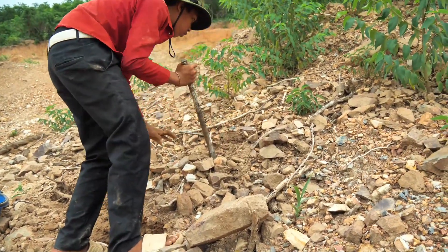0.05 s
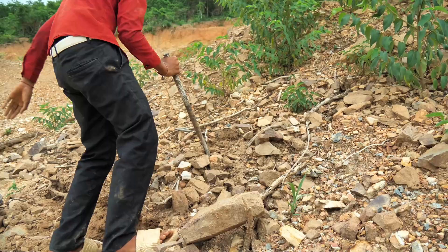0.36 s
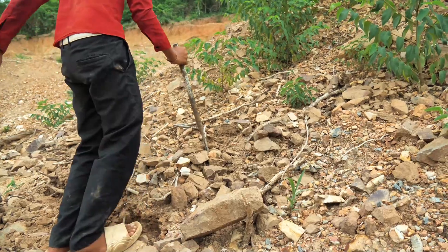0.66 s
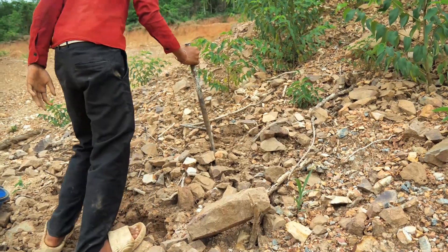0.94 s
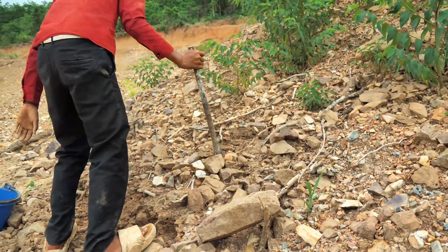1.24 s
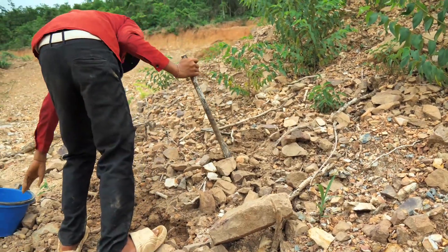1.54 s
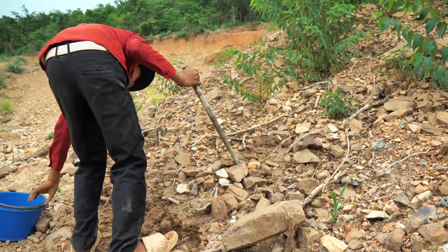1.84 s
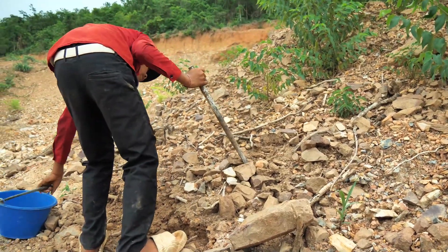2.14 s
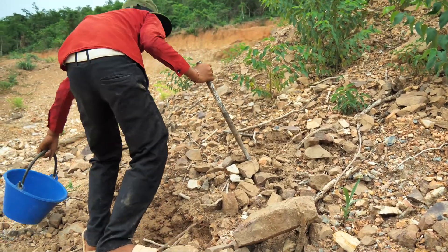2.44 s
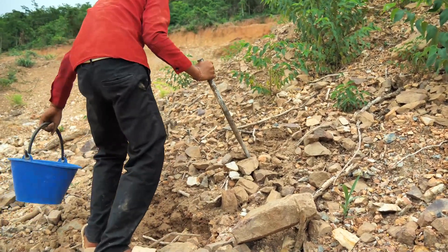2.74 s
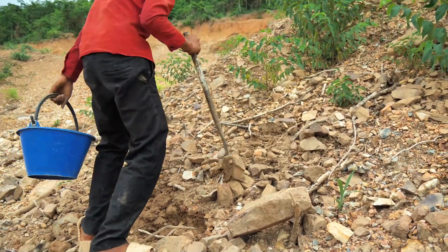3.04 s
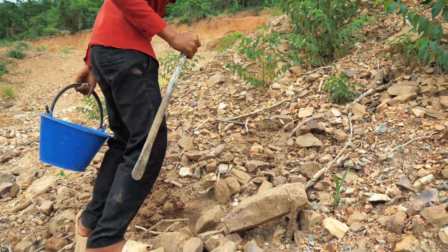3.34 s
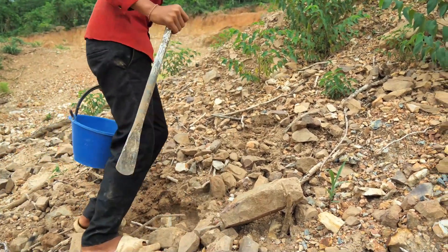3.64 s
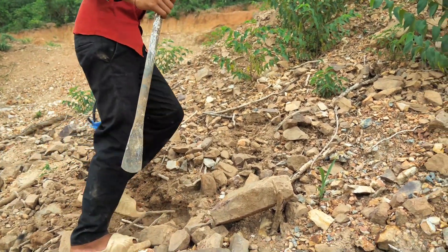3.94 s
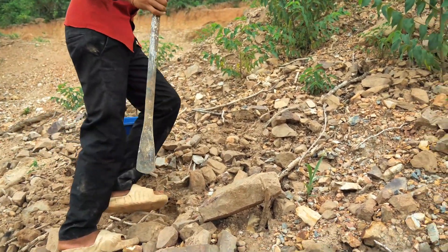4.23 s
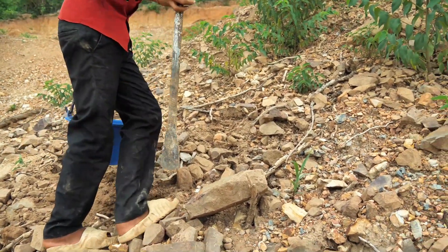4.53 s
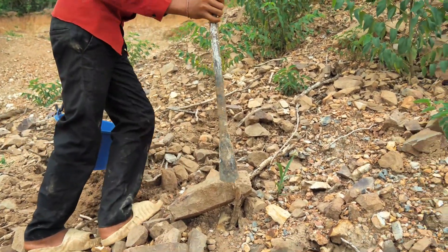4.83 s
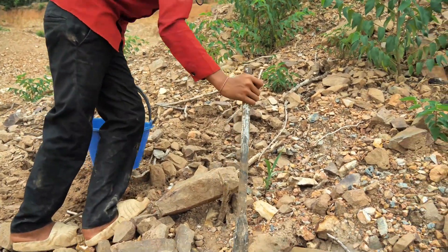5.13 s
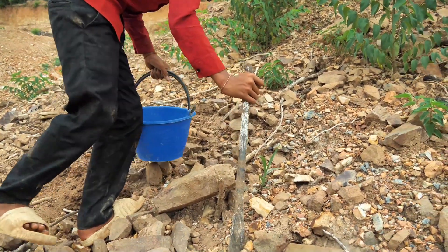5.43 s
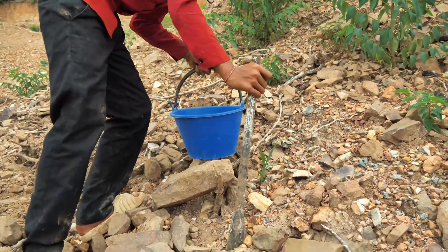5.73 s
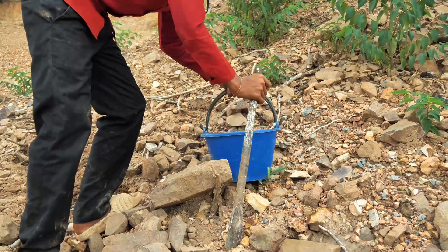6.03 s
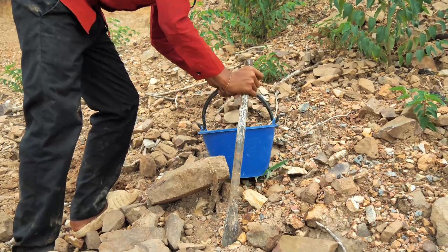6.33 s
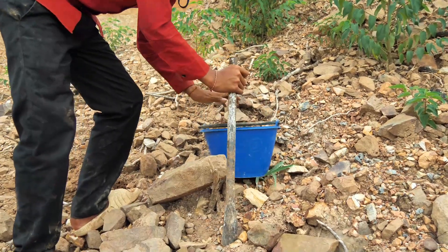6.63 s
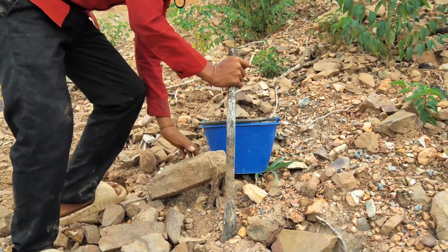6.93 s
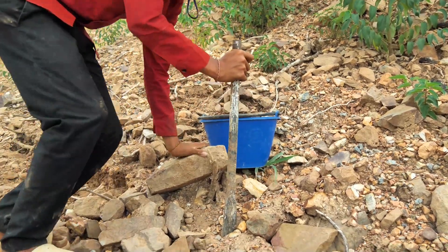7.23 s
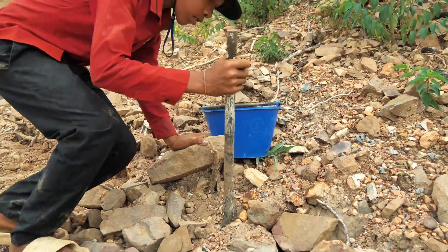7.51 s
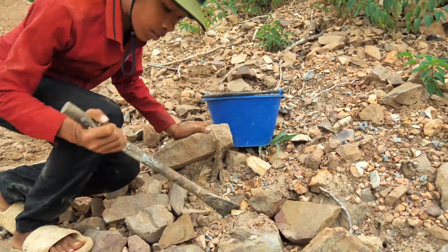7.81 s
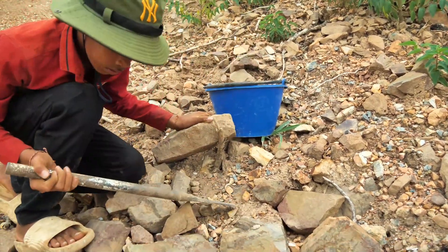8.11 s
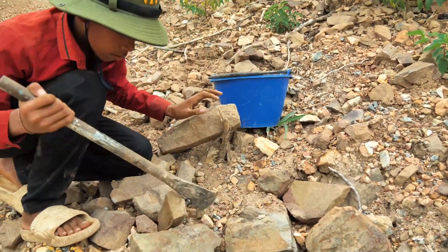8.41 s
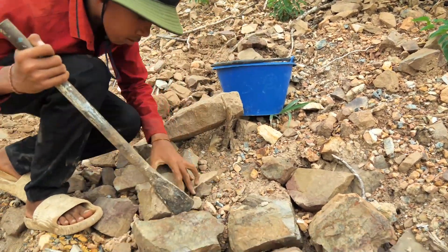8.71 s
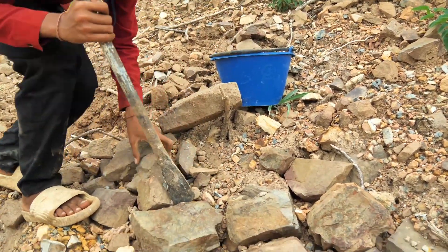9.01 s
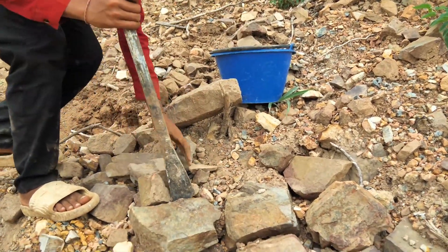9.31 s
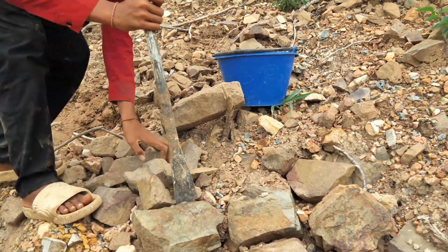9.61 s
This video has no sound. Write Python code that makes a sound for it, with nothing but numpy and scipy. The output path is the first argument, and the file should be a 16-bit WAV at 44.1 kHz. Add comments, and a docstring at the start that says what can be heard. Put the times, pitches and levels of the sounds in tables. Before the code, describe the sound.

Loose stones knock underfoot, a plastic bucket is set down, and a steel digging bar scrapes and clanks loudly on rock outdoors.

```python
"""Open hillside of loose stones: someone shuffles about, sets down a plastic bucket, drops its handle
and pries with a steel digging bar. The bar zings faintly in the hand, scrapes gravel, clanks on rock
and rings in bending modes until damped. The bucket's hollow wall booms; its wire hooks jingle. Stones
knock and thud underfoot. Gravel, soles and cloth scuff over quiet outdoor hiss. No walls, no echo."""
import sys
import numpy as np
from scipy import signal
from scipy.fft import rfft, irfft
from scipy.io import wavfile
from scipy.ndimage import uniform_filter1d

SR = 44100
rng = np.random.default_rng(int(sys.argv[2]) if len(sys.argv) > 2 else 0)


def int16_out(signal):
    """Quantize to a 16-bit WAV file."""
    q = np.round(np.clip(np.atleast_2d(signal).T, -1, 1) * 32767)
    wavfile.write(sys.argv[1], SR, q.astype(np.int16))


N = 430416

# bar contacts: t/s, level/dB, tilt/(dB/oct), lead mode f/Hz, its boost/dB, free ring/s
BAR_HITS = [(1.114, -19.5, 1, 2162, 36.5, 0.16), (1.115, -24.5, -3.5, 5470, 30.5, 0.02),
            (1.155, -29, 3, 5470, 19, 0.0069), (8.155, -21, -0.5, 1470, 19.5, 0.066),
            (8.357, -15, -1, 5470, 10.5, 0.007), (8.488, -12.5, -2, 3338, 11, 0.036),
            (8.643, 2.5, 0.5, 791, 4, 0.079), (8.709, 1, -0.5, 5470, 13, 0.046),
            (8.744, -3, -2, 4624, 12, 0.027), (8.779, -7.5, -2, 812, 13.5, 0.01),
            (8.795, -6.5, -1.5, 812, 13, 0.0059)]
# bar bending modes: f/Hz, level/dB, t60/s
STEEL_MODES = [(803, -26, .9), (1102, -33, .7), (1470, -35, .5), (2003, -36, .25), (2162, -33, .19),
               (2366, -36, .5), (3338, -35, .5), (3570, -35, .4), (4624, -37, .5), (5203, -36, .25),
               (5470, -35, .2), (5972, -35, .25), (7095, -41, .15), (7388, -35, .3), (8696, -32, .18),
               (9825, -40, .22), (11405, -39, .22), (12890, -44, .12), (14300, -46, .22)]
# blade bouncing on a slab: t/s, level/dB, cut-off f/Hz, chatter t60/s
SLAB_HITS = [(8.6433, -13, 6440, 0.0068), (8.683, -22, 3200, 0.016), (8.7086, -19, 5000, 0.02),
             (8.743, -26.5, 2500, 0.023), (8.779, -24.5, 2190, 0.034), (8.796, -31, 2290, 0.022)]
# slab modes: f/Hz, level/dB, t60/s
ROCK_MODES = [(404, 18, 0.039), (1170, 10, 0.0073), (1570, 4, 0.011), (2880, 22, 0.012),
              (3090, 20.5, 0.013), (3900, 23.5, 0.011), (5500, 4, 0.0099),]
# bar rubbed, shaft in hand (faint) or blade on gravel: start t/s, end t/s, level/dB, brightest f/Hz
BAR_RUBS = [(1.315, 1.38, -57, 7100), (2.963, 3.073, -55, 6730), (8.02, 8.197, -48, 5000),
            (8.42, 8.524, -42.5, 3440), (8.8, 9.065, -55.5, 4500)]
# bucket rocking to rest, then handle bouncing: t/s, level/dB, hardness/(dB/band), nominal t60/s
BUCKET_HITS = [(6.034, -17.5, 1.5, 0.26), (6.051, -17, 2, 0.14), (6.076, -15.5, -2.5, 0.051),
               (6.084, -15.5, -2.5, 0.018), (6.117, -18.5, -1, 0.38), (6.153, -18, -1, 0.052),
               (6.218, -28, 0.5, 0.033), (6.315, -30, -2.5, 0.022), (6.663, -18.5, 3.5, 0.15),
               (6.726, -15.5, 5, 0.032), (6.787, -23.5, 3, 0.07), (6.816, -32, 3, 0.074)]
# bucket wall modes: f/Hz, level/dB, t60/s
WALL_MODES = [(226, 19, 0.092), (295, 26.5, 0.028), (376, 25, 0.033), (790, 19.5, 0.015),
              (1380, 14.5, 0.018), (1520, 6, 0.029), (2096, 13, 0.044), (2857, 15.5, 0.01)]
# hooks catching in their lugs: t/s, level/dB
HOOK_CATCHES = [(5.18, -30.5), (5.252, -41.5), (5.433, -43.5), (5.615, -40.5), (5.701, -43), (5.893, -41),
                (5.955, -36.5), (5.98, -37.5)]
# hooks rubbing: start t/s, end t/s, level/dB
HOOK_RUB = (5.2, 6.0, -50)
# hook modes: f/Hz, level/dB
WIRE_MODES = [(2826, -3.5), (3192, -10), (3989, -7.5), (5959, -5), (6298, -13), (7650, -3.5),
              (10180, -13.5), (11908, -19)]
# knocked stones: t/s, level/dB, f/Hz, softness/(dB/oct), nominal t60/s
STONE_KNOCKS = [(0.574, -43, 3270, 2, .006), (0.743, -43, 3230, -2.5, 0.0057),
                (1.094, -36.5, 1050, 1.5, 0.04), (1.112, -25.5, 1000, 4.5, 0.021),
                (1.157, -29, 1473, 9, 0.018), (1.946, -40.5, 1870, 10, 0.0067),
                (2.299, -42, 2220, 5, 0.024), (3.097, -30.5, 3500, 5, 0.007), (3.216, -18, 2800, 31, 0.017),
                (3.313, -28.5, 3400, 18, 0.015), (3.327, -24, 5000, 1, 0.022),
                (3.502, -21, 1510, 30, 0.012), (3.572, -33, 2440, 5, 0.016), (3.757, -29, 1670, 7, 0.023),
                (5.157, -18.5, 1246, 3.5, 0.025), (5.161, -19, 2950, -1, 0.019),
                (5.169, -20.5, 2690, 22, 0.022), (5.303, -25.5, 860, 5, 0.04),
                (5.506, -35.5, 2000, 9, 0.013), (5.631, -43, 7640, -2, 0.0066), (5.72, -35, 3000, 4, 0.1),
                (7.385, -36, 1530, 4.5, 0.021), (7.852, -35, 9700, 0, 0.017), (8.125, -35, 970, 3, 0.0083),
                (8.154, -27, 845, 8, 0.024), (8.401, -30.5, 701, 9, 0.019), (8.618, -34.5, 8300, 0, 0.0095),
                (8.854, -43, 5370, -10, 0.0043), (9.132, -36, 845, 12, 0.034),
                (9.289, -25.5, 890, 8, 0.015), (9.321, -20.5, 1540, 28, 0.019),
                (9.327, -18, 830, 9.5, 0.022), (9.333, -21.5, 1330, 21, 0.035),
                (9.362, -31, 2640, 6, 0.033), (9.615, -28.5, 856, 14, 0.017), (9.652, -28, 744, 9, 0.014)]
# stones trodden or dropped into soil: t/s, level/dB, f/Hz, relative grit level/dB, nominal t60/s
STONE_THUDS = [(0.322, -22, 384, -21, 0.015), (0.426, -36, 375, 2, 0.027), (0.684, -39, 277, -13, 0.024),
               (.718, -37, 270, -16, 0.016), (0.786, -32, 238, -24, 0.024), (0.801, -27, 303, -28, 0.05),
               (0.824, -34.5, 240, -17, 0.025), (0.916, -33.5, 186, -31, 0.24),
               (.973, -32, 232, -18, 0.069), (1.807, -32, 381, -32, 0.034), (2.036, -33, 397, -46, 0.13),
               (3.043, -35.5, 385, -3, 0.026), (3.138, -25, 410, -27, 0.022), (3.328, -28.5, 247, -7, 0.22),
               (3.433, -29.5, 390, -4.5, 0.014), (3.504, -24, 288, -39, 0.015),
               (3.546, -27, 323, -9.5, 0.0074), (4.038, -33, 430, -16, 0.013),
               (4.078, -38, 384, -25, 0.025), (4.555, -37.5, 272, -20, 0.028),
               (4.568, -35.5, 235, -20, .045), (5.331, -24, 268, -30, 0.13), (8.743, -30, 233, -22, 0.025),
               (8.779, -28, 268, -14, 0.013), (9.279, -35, 209.7, -25, 0.037),
               (9.424, -34.5, 366, -28, 0.012)]
# gravel, soles and cloth brushing over dry ground: start t/s, end t/s, level/dB
SCUFFS = [(1.148, 1.367, -44.5), (1.757, 1.792, -41), (2.259, 2.324, -48), (4.084, 4.272, -46),
          (4.341, 4.554, -51), (5.245, 5.442, -42), (5.689, 5.827, -41.5), (6.904, 7.036, -43.5),
          (7.237, 7.676, -41.5), (7.692, 7.802, -37.5), (7.809, 8.298, -46), (8.383, 8.603, -37),
          (8.883, 9.113, -40), (9.267, 9.539, -46.5), (9.549, 9.795, -41.5)]
# soles pressing the slope: start t/s, end t/s, level/dB
FOOTSTEPS = [(2.367, 2.499, -50.5), (3.496, 3.701, -46.5), (4.066, 4.147, -51.5), (4.548, 4.645, -50),
             (5.303, 5.395, -32), (6.173, 6.405, -48), (6.637, 6.695, -33.5), (9.212, 9.531, -48)]
# spectrum of stone on stony soil: f/Hz, level/dB
GROUND_SPECTRUM = [(60, -7), (120, -8.5), (220, -0.5), (370, 0.5), (540, -9.5), (860, 1), (1110, -11),
                   (1450, -3.5), (1850, -12.5), (3000, -9.5), (4400, -19), (8000, -18.5), (9200, -31),
                   (15000, -28)]
# outdoor hiss density: f/Hz, relative level/dB
AIR_SPECTRUM = [(30, -47), (60, -23), (100, 6), (170, -4), (310, 6), (500, 2), (820, -3.5), (1250, -9),
                (2100, -11), (3150, -6), (4000, -19.5), (8200, -23.5), (9200, -32), (15000, -21)]
# thud, knock, clack and tick bands: low f/Hz, high f/Hz
BANDS_HZ = [(125, 560), (560, 1900), (1900, 4500), (4500, 15000)]
# share of each of those bands: level/dB
SOIL_DB, GRIT_DB, PLASTIC_DB = (1, -13, -21, -44), (-30, -10.5, -12, -2), (0, -2, -18, -27)


def bar(stop_t60_s=0.077, rise_s=0.00055, pan_db=4, split=0.0068, rattle_db=1.2, rattle_hz=240):
    """Each contact point favours other modes; they ring and rattle on stone until the blade is stopped."""
    out, t = np.zeros((2, N)), np.arange(SR // 4) / SR
    hz, mode_db, t60_s = np.transpose(STEEL_MODES)
    balance_db = pan_db * rng.standard_normal(len(hz)) * np.minimum(hz / hz.mean(), 1)
    sides = undb(balance_db * np.array([[.5], [-.5]]))
    angle = 2 * np.pi * hz[:, None] * t
    hold = int(SR / rattle_hz)
    for at_s, db, tilt_db, lead_hz, boost_db, free_s in BAR_HITS:
        levels_db = mode_db + db + tilt_db * np.log2(hz / 2500)
        levels_db[np.argmin(abs(hz - lead_hz))] += boost_db
        phase, twin_phase = rng.uniform(0, 2 * np.pi, (2, len(hz), 1))
        # uneven shaft bends in two planes: each mode beats with a close twin
        twins = .08 * np.sin(angle * (1 + split) + twin_phase)
        rings = (np.sin(angle + phase) + twins) * fade(t, t60_s[:, None])
        damping = fade(np.maximum(t - free_s, 0), stop_t60_s) * np.minimum(t / rise_s, 1)
        jolts = rng.standard_normal((len(hz), 200))[:, np.arange(len(t)) // hold]
        rattle = undb(rattle_db * uniform_filter1d(jolts, hold))
        add(out, at_s, (sides * undb(levels_db)) @ (rings * rattle) * damping)
    return out


def clanks(crack_db=-7, chatter_db=-10, width=0.27):
    """Steel on rock: impact and chatter ring the slab's short modes; softer bounces are duller."""
    out, t = np.zeros((2, N)), np.arange(SR // 10) / SR
    slab = modal(ROCK_MODES)
    slab[0] += undb(crack_db)
    for at_s, db, cut_hz, chatter_s in SLAB_HITS:
        force = undb(chatter_db) * noise(len(t), width) * fade(t, chatter_s)
        force[:, 0] += 1
        force = band(force, (220.5, cut_hz), order=2)
        add(out, at_s, unit(through(force, slab)) * undb(db) / np.sqrt(10))  # energy re 10 ms
    return out


def bar_rubs(damped_t60_s=0.14, falloff_db_oct=12):
    """Friction rings the bar: faint high zings of shaft in hand, louder scrapes of blade on gravel."""
    out = np.zeros((2, N))
    force = crunch(rate_hz=150, spread_db=2, grain_s=.003, width=.5, hiss=.5, slip_db=5)
    for start_s, end_s, db, bright_hz in BAR_RUBS:
        steel = modal([(hz, mode_db - falloff_db_oct * abs(np.log2(hz / bright_hz)), damped_t60_s)
                       for hz, mode_db, _ in STEEL_MODES])
        out += unit(through(force, steel)) * undb(db) * swell(start_s, end_s)
    return out


def bucket(direct_db=-1, cut_hz=1700):
    """Knocks ring the hollow plastic wall: dull from base on soil, brighter from handle on rim."""
    out, wall = np.zeros((2, N)), modal(WALL_MODES)
    wall[0] += undb(direct_db)
    wall = signal.sosfilt(signal.butter(1, cut_hz, fs=SR, output="sos"), wall)
    for at_s, db, hardness_db, decay_s in BUCKET_HITS:
        shares_db = PLASTIC_DB + hardness_db * np.arange(len(BANDS_HZ))
        add(out, at_s, impact(db + shares_db, decay_s, wall, click=2.1, grain_db=5,
                              tail_db=-21.5, tail_s=0.18, rise_s=0.00096))
    return out


def hooks(catch_t60_s=0.025, rub_t60_s=0.014, rise_s=0.0039, scatter_db=4, detune=0.011):
    """Wire hooks grate as the bucket swings; each catch shifts the contact, so mode pitch and level."""
    start_s, end_s, rub_db = HOOK_RUB
    rubbing = crunch(rate_hz=70, spread_db=3, grain_s=0.002, width=0.4, hiss=0.08, slip_db=5)
    rubbed_wire = modal([(hz, db, rub_t60_s) for hz, db in WIRE_MODES])
    out = unit(through(rubbing, rubbed_wire)) * undb(rub_db) * swell(start_s, end_s)
    t = np.arange(SR // 10) / SR
    for at_s, db in HOOK_CATCHES:
        wire = modal([(hz * (1 + detune * rng.standard_normal()),
                       mode_db + scatter_db * rng.standard_normal(), catch_t60_s)
                      for hz, mode_db in WIRE_MODES], size=4096)
        wire[0] += .07  # dry rasp
        force = noise(len(t), 0.24) * t * np.exp(-t / rise_s)
        add(out, at_s - rise_s, unit(through(force, wire)) * undb(db) / np.sqrt(10))  # energy re 10 ms
    return out


def knocks(below_db_oct=2.5, grit_floor_db=-23.5):
    """Stone on stone or steel: softer contacts lose more above the stone's pitch but still crush grit."""
    out, centres_hz = np.zeros((2, N)), np.sqrt(np.prod(BANDS_HZ, axis=1))
    for at_s, db, hz, softness_db_oct, decay_s in STONE_KNOCKS:
        octaves = np.log2(centres_hz / hz)
        loss_db = abs(octaves) * np.where(octaves < 0, below_db_oct, softness_db_oct)
        shares_db = np.maximum(-loss_db, grit_floor_db)
        add(out, at_s, impact(db + shares_db, decay_s, stone(hz), click=4.9, grain_db=4.5,
                              tail_db=-23, tail_s=0.14))
    return out


def thuds():
    """A trodden stone thumps the soil at a pitch set by its size and cracks the grit beneath."""
    out = np.zeros((2, N))
    for at_s, db, hz, grit_db, decay_s in STONE_THUDS:
        shares_db = np.maximum(SOIL_DB, np.add(GRIT_DB, grit_db))
        body = stone(hz, ring_db=10, max_t60_s=0.022)
        add(out, at_s, impact(db + shares_db, decay_s, body, click=3.4, grain_db=3.5,
                              tail_db=-27.5, tail_s=0.11))
    return out


def scuffs(shares_db=(-6, -5, -9)):
    """Gravel, soles and cloth brush over dry ground: an even low rub under stick-slip grains."""
    low = crunch(rate_hz=500, spread_db=1, grain_s=.003, width=.05, hiss=1, slip_db=3)
    mid = crunch(rate_hz=900, spread_db=4.5, grain_s=.0015, width=.4, hiss=.3, slip_db=7)
    high = crunch(rate_hz=1100, spread_db=5, grain_s=.00087, width=.44, hiss=.31, slip_db=5)
    layers = ground_layers(low, mid, high, top_hz=15000)
    rasp = sum(layer * undb(db) for layer, db in zip(layers, shares_db))
    return rasp * sum(undb(db) * swell(start_s, end_s) for start_s, end_s, db in SCUFFS)


def shuffle(shares_db=(0, -6.5, -30), rests_db=(-54.5, -60.5, -60)):
    """Steps press soil, roll gravel and grind grit; in between the ground barely stirs."""
    soil = crunch(rate_hz=120, spread_db=-2.5, grain_s=.0018, width=.0066, hiss=.19, slip_db=3.5)
    gravel = crunch(rate_hz=160, spread_db=-2.5, grain_s=.0012, width=.48, hiss=.3, slip_db=8.5)
    grit = crunch(rate_hz=1100, spread_db=-3, grain_s=.0012, width=.95, hiss=.29, slip_db=5)
    layers = ground_layers(soil, gravel, grit, top_hz=14500)
    steps = sum(undb(db) * swell(start_s, end_s) for start_s, end_s, db in FOOTSTEPS)
    return sum(layer * (steps * undb(share_db) + undb(rest_db))
               for layer, share_db, rest_db in zip(layers, shares_db, rests_db))


def pebbles(count=70, rest_db=-65, scatter_db=2.5, median_hz=1700, t60_s=.016):
    """Pebbles of mixed size tick faintly, more often and harder during scuffs and steps."""
    out, t = np.zeros((2, N)), np.arange(SR // 10) / SR
    odds = 1 + 3 * sum(swell(start_s, end_s) for start_s, end_s, _ in SCUFFS + FOOTSTEPS)
    onsets = rng.choice(N, count, p=odds / odds.sum())
    traits = np.clip(rng.standard_normal((count, 2)), -2, 2)
    for onset, (strength, smallness) in zip(onsets, traits):
        hz = median_hz * np.exp(smallness / 2)
        force = noise(len(t), 0.63) * fade(t, t60_s)
        tick = band(through(force, stone(hz, ring_db=7)), (hz / 2, 2 * hz), order=1)
        add(out, onset / SR, unit(tick) * undb(rest_db + scatter_db * strength) * np.sqrt(odds[onset]))
    return out


def air(level_db=-53, width=0.37):
    """Steady outdoor hush, centred in the bass, wide in the treble."""
    mid, side = through(rng.standard_normal((2, N)), colour(AIR_SPECTRUM))
    side = width * band(side, (900, 16000), order=1)
    return unit(np.array([mid + side, mid - side])) * undb(level_db)


def impact(levels_db, decay_s, body, click, grain_db, tail_db, tail_s, rise_s=0.000977):
    """One contact, then a fading chatter of tiny ones; nearby stones scatter a faint tail."""
    out, t = 0, np.arange(SR // 5) / SR
    grains = np.repeat(rng.standard_normal(len(t)), SR // 2000)[:len(t)]
    chatter = unit(undb(grain_db * grains))
    stretches, tail_trims_db = (0.74, 1, 0.77, 1), (3, -1, -2.5, 6.5)
    widths = (0.0069, 0.12, 0.35, 0.58)  # high bands scatter wider
    for edges_hz, db, stretch, width, trim_db in zip(BANDS_HZ, levels_db, stretches, widths,
                                                     tail_trims_db):
        tail = undb(tail_db + trim_db) * fade(t, tail_s)
        force = noise(len(t), width) * (chatter * fade(t, decay_s * stretch) + tail)
        force *= 1 - np.exp(-t / rise_s)
        force[:, int(rise_s * SR)] += click
        out = out + unit(band(through(force, body), edges_hz)) * undb(db)
    return out / np.sqrt(20)  # energy re 10 ms


def crunch(rate_hz, spread_db, grain_s, width, hiss, slip_db, slip_hz=45):
    """Small unequal contacts over a sliding hiss, sticking and slipping."""
    sizes = undb(spread_db * np.minimum(rng.exponential(size=N), 4))
    contacts = sizes * (rng.random(N) < rate_hz / SR)
    power = signal.lfilter([1], [1, -np.exp(-1 / (grain_s * SR))], contacts ** 2)
    hold = int(SR / slip_hz)
    slips = uniform_filter1d(rng.uniform(-1, 1, N)[np.arange(N) // hold], hold // 2)
    return noise(N, width) * np.sqrt(power / power.mean() + hiss) * undb(slip_db * slips)


def stone(hz, ring_db=13, cycles=16, max_t60_s=0.0088):
    """Ground response plus a stone's short clink; soil cuts low rings short."""
    ground = colour(GROUND_SPECTRUM)
    ring = modal([(hz, ring_db, min(cycles / hz, max_t60_s))], size=2048)
    return ground + signal.fftconvolve(ground, ring)[:len(ground)]


def ground_layers(low, mid, high, top_hz):
    """Three forces through the ground, one per band, each at rms 1."""
    ground, bands_hz = colour(GROUND_SPECTRUM), [(120, 600), (600, 4000), (4000, top_hz)]
    return [unit(band(through(force, ground), edges_hz))
            for force, edges_hz in zip((low, mid, high), bands_hz)]


def modal(modes, size=8192):
    """Impulse response of modes: f/Hz, peak level/dB, t60/s."""
    t = np.arange(size) / SR
    return sum(undb(db) * 2 * np.log(1000) / (t60_s * SR) * fade(t, t60_s) * np.cos(2 * np.pi * hz * t)
               for hz, db, t60_s in modes)


def colour(spectrum, size=2048):
    """Minimum-phase impulse response of a spectrum: f/Hz, level/dB."""
    hz, db = np.transpose(spectrum)
    bins_hz = np.fft.rfftfreq(size, 1 / SR) + 1
    gain = undb(np.interp(np.log(bins_hz), np.log(hz), db))
    cepstrum = irfft(np.log(gain))
    cepstrum[1:size // 2] *= 2
    cepstrum[size // 2 + 1:] = 0
    return irfft(np.exp(rfft(cepstrum)))


def through(x, response):
    """Pass both channels through a body."""
    return signal.fftconvolve(x, response[None], axes=-1)[:, :x.shape[-1]]


def band(x, edges_hz, order=3):
    """Causal band-pass."""
    return signal.sosfilt(signal.butter(order, edges_hz, "band", fs=SR, output="sos"), x)


def noise(size, width):
    """Mid/side stereo noise."""
    mid, side = rng.standard_normal((2, size))
    return np.array([mid + width * side, mid - width * side])


def swell(start_s, end_s, edge_s=0.053):
    """Soft-edged envelope of one movement."""
    t = np.arange(N) / SR
    return np.clip(np.minimum(t - start_s, end_s - t) / edge_s + .5, 0, 1)


def fade(t, t60_s):
    """Exponential decay, -60 dB at t60_s."""
    return np.exp(-np.log(1000) * t / t60_s)


def undb(db):
    """dB to gain."""
    return 10 ** (np.asarray(db) / 20)


def unit(x):
    """Scale to rms 1."""
    return x / np.sqrt(np.mean(x ** 2))


def add(out, at_s, x):
    """Mix x into out from at_s."""
    i = int(at_s * SR)
    out[:, i:i + x.shape[-1]] += x[..., :N - i]


def scene():
    """Everything on the hillside."""
    return (knocks() + thuds() + bucket() + hooks() + bar() + clanks() + bar_rubs()
            + shuffle() + scuffs() + pebbles() + air())


def record(dry, port_share=0.17, balance_db=0.85, lag_s=1e-5, top_hz=15600):
    """Left port leads and is more sensitive near 1 kHz; then full-scale clipping and treble cut-off."""
    sides = np.array([[1], [-1]])
    shift = np.exp(1j * np.pi * np.fft.rfftfreq(N, 1 / SR) * lag_s * sides)
    spaced = irfft(rfft(dry) * shift, N)
    ported = spaced + port_share * sides * band(spaced, (750, 1500), order=1)
    clipped = np.clip(ported * undb(balance_db * sides / 2), -1, 1)
    return signal.sosfilt(signal.ellip(8, .2, 70, top_hz, fs=SR, output="sos"), clipped)


dry = scene()
out = record(dry)
int16_out(out)
```